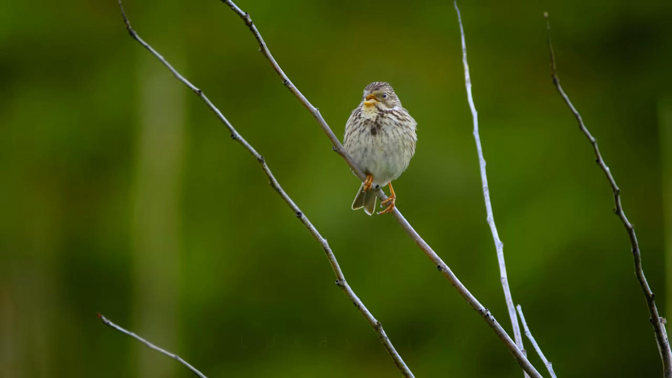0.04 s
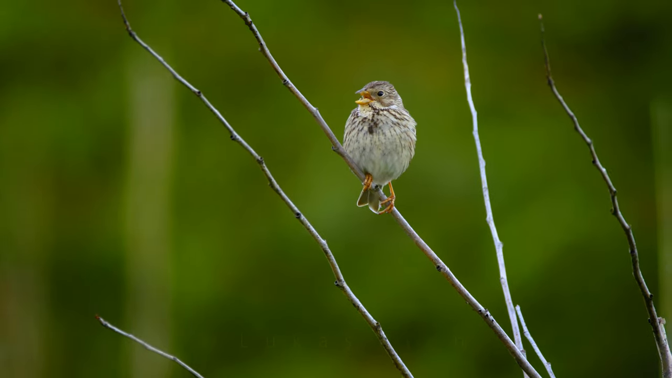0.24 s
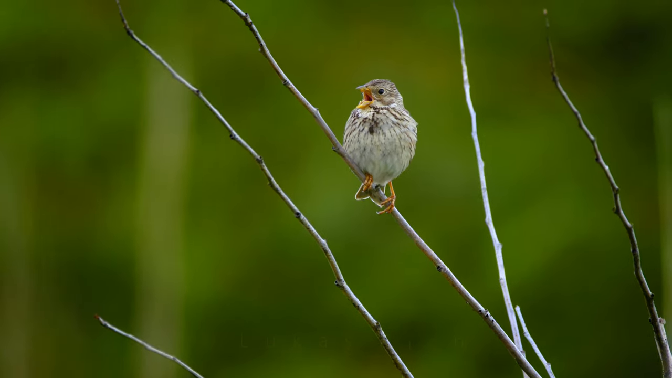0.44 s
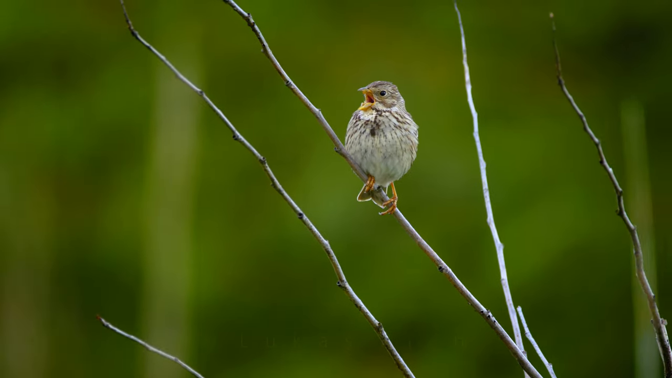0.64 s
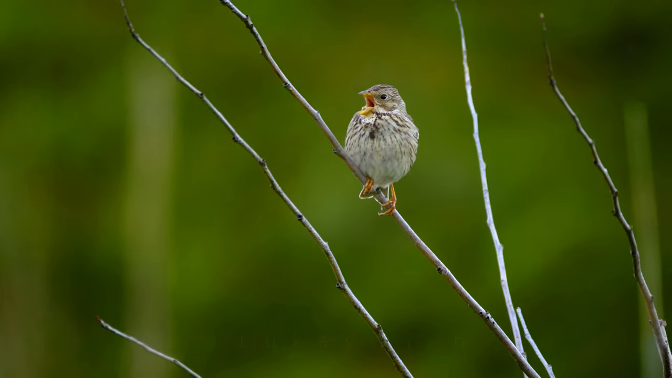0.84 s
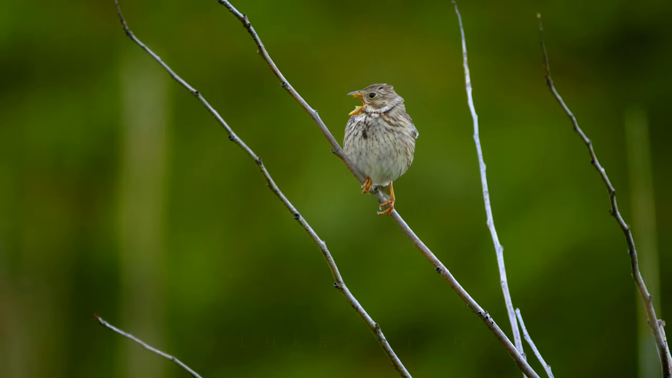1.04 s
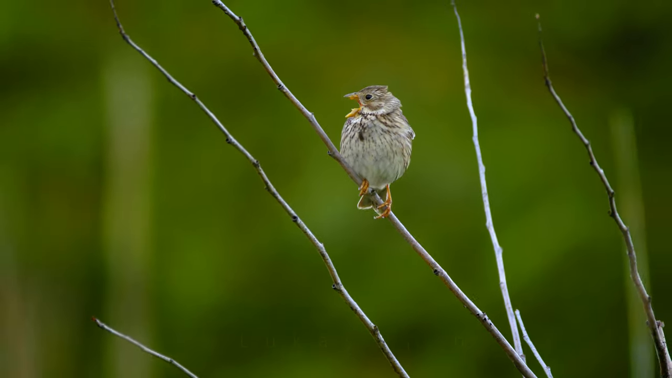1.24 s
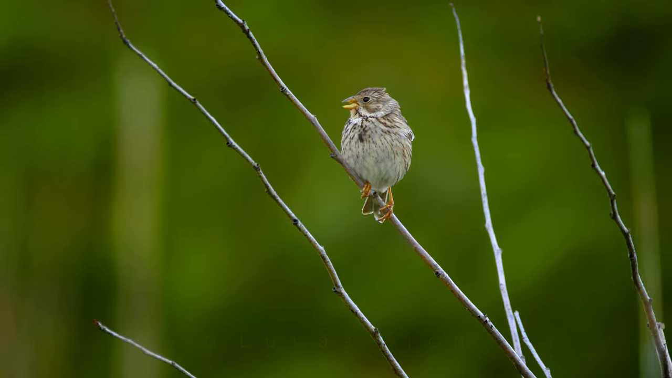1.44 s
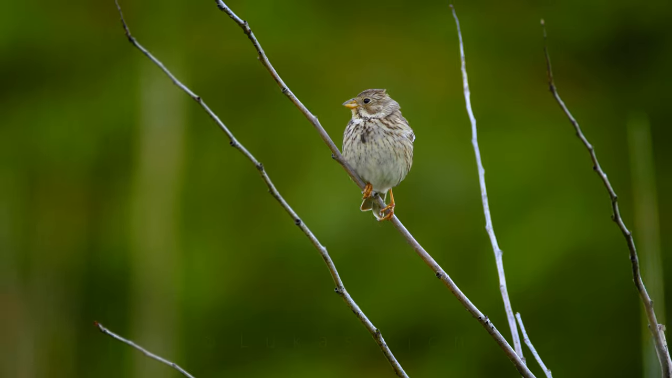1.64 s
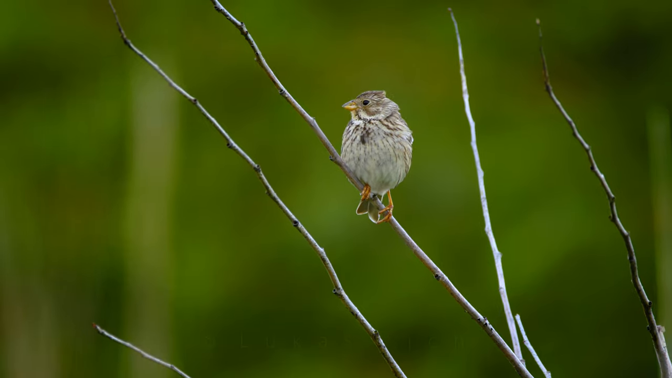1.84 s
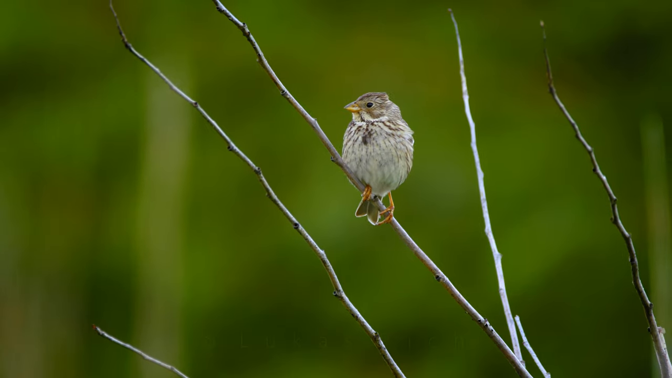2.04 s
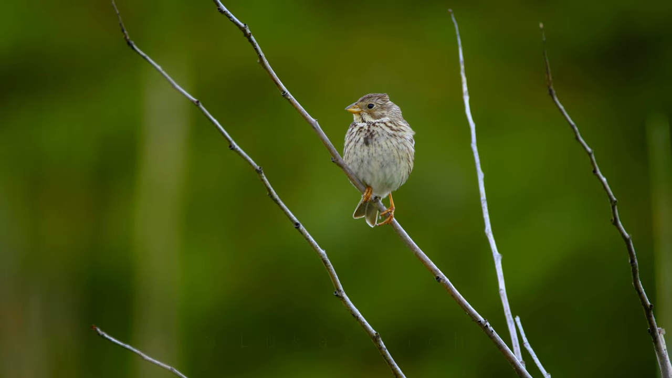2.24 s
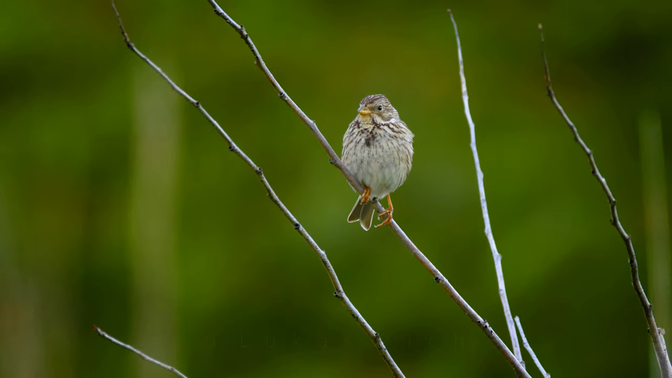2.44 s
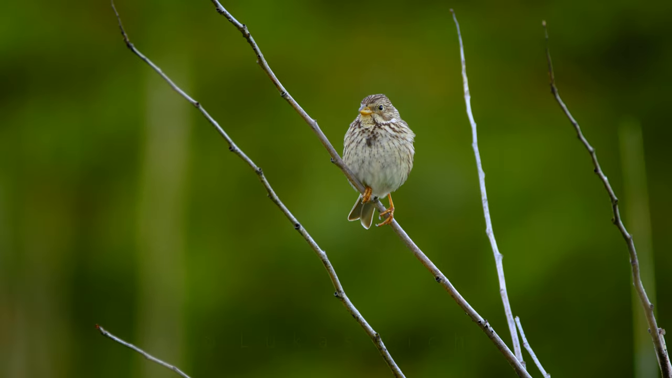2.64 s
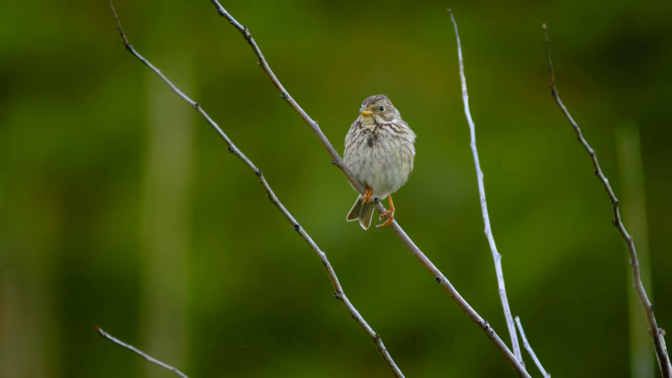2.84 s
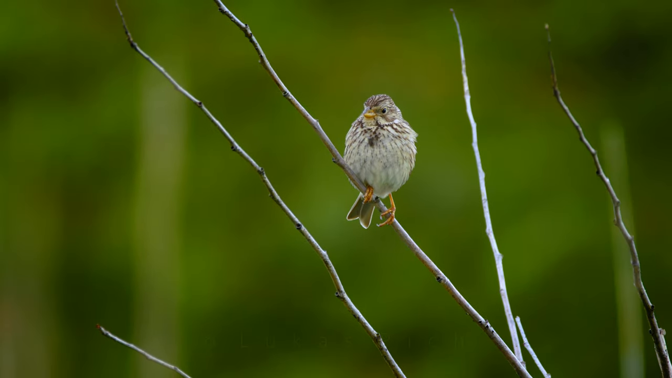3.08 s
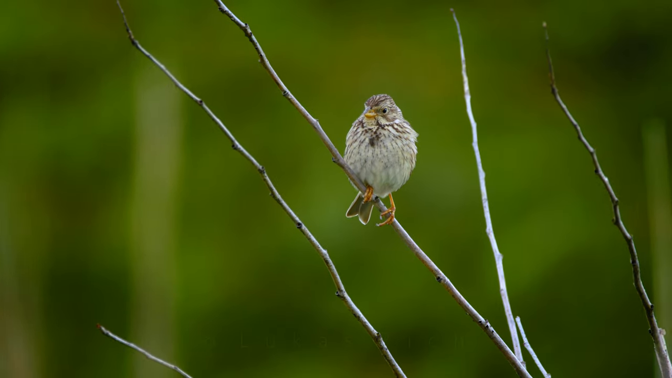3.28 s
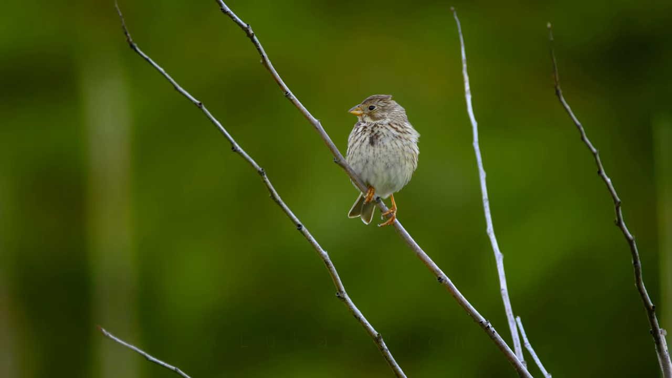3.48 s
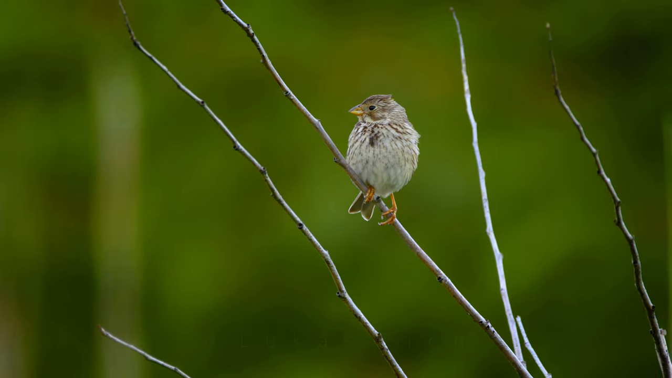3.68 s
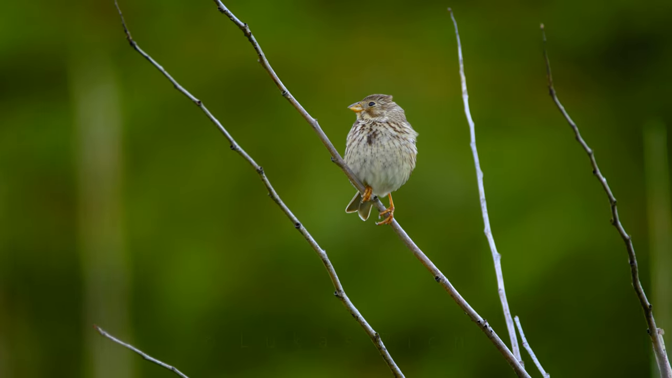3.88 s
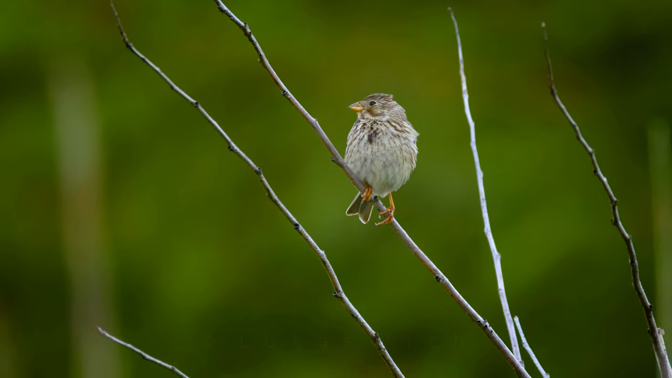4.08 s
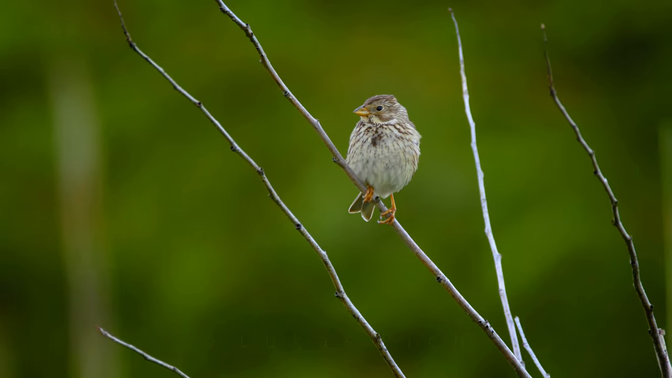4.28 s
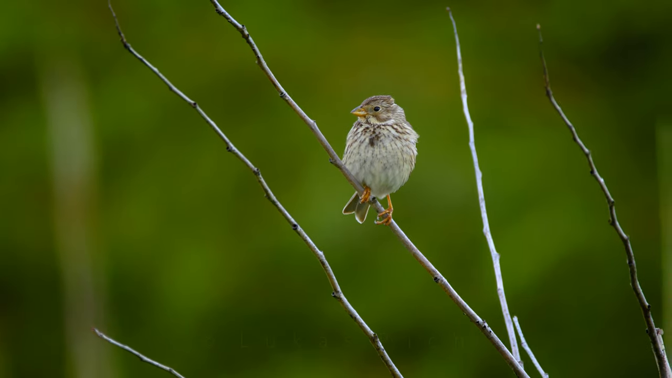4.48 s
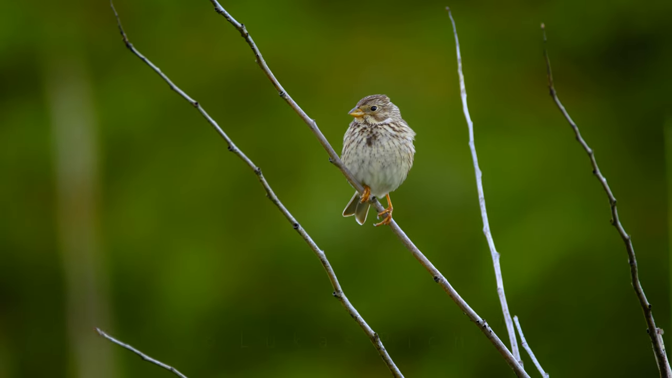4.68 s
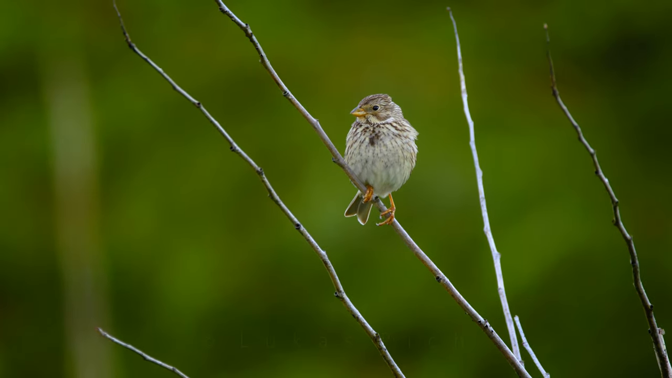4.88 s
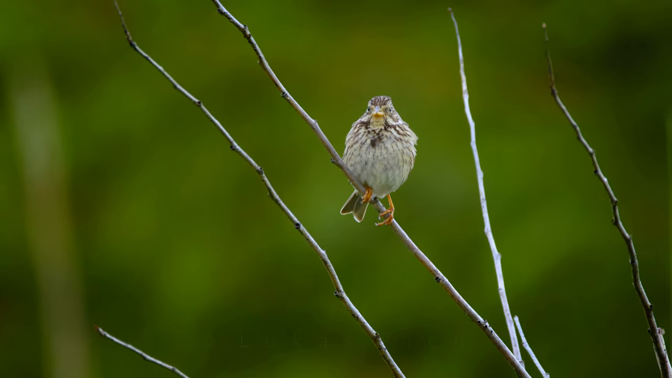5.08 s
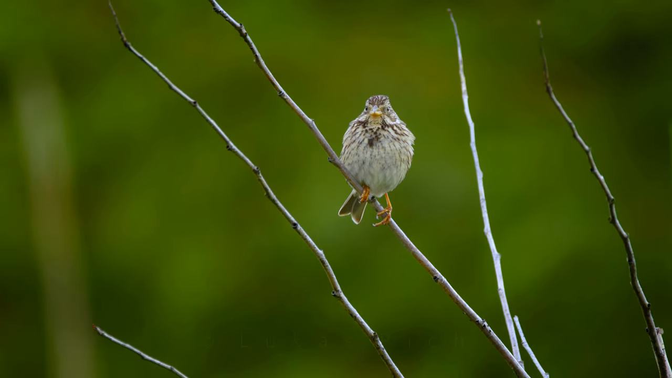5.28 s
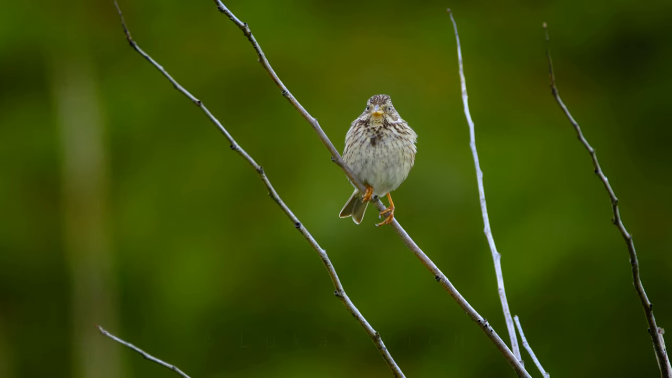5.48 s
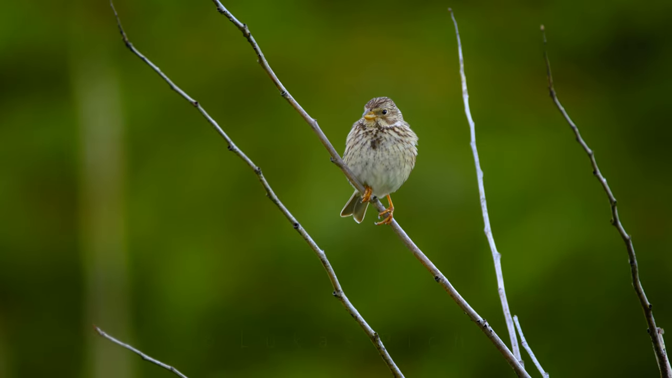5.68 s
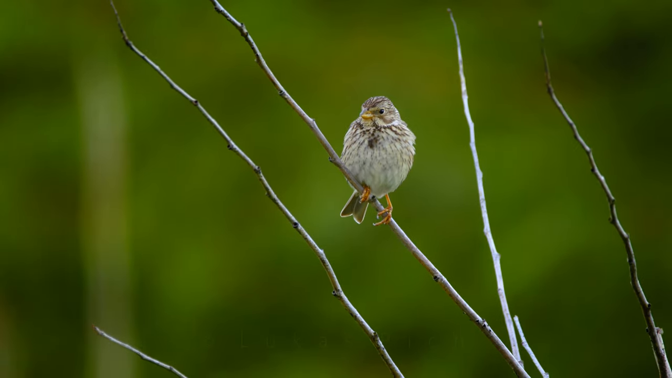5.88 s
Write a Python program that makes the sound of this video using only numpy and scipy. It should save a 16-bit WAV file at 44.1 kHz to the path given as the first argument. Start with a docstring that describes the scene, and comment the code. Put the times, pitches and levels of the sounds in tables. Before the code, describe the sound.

A small bunting sings one fast jangling song of dry chips, trills and buzzes, then scratchy distant calls continue over quiet meadow hiss.

```python
"""A corn bunting sings one jangling song: dry chips speed up into trills and buzzes from its two syrinx voices.
Each voice is a near sine gliding in pitch; bill resonances colour it and near surfaces echo it.
Further off a small bird repeats a scratchy four-pulse call, built from harmonics ringing in its throat.
Distant birds whistle in slow glides and twitter in random chirps.
Behind them shaped noise gives the air, a far road and ticking grass, over a very faint low hum."""
import sys
import numpy as np
from scipy import signal
from scipy.fft import rfft, irfft, next_fast_len
from scipy.io import wavfile
from scipy.ndimage import map_coordinates

SR = 44100
rng = np.random.default_rng(int(sys.argv[2]) if len(sys.argv) > 2 else 0)


def waveform_to_disk(signal):
    """Save audio, clipped to [-1, 1], as 16-bit WAV at the path in sys.argv[1]."""
    frames = np.transpose(np.atleast_2d(signal))
    scaled = np.clip(frames, -1, 1) * 32767
    samples = np.round(scaled).astype(np.int16)
    wavfile.write(sys.argv[1], SR, samples)


N = 261072
TIME = np.arange(N) / SR

# All levels are relative: modulation, filtering or a mixing gain follows.
# Dry chips that open the song. Each row: start in seconds, level in dB.
CHIPS = [(.232, -22), (.382, -20.5), (0.477, -23)]
# A faint flick and a stroke make every chip. Each row: delay in seconds, length in seconds,
# start, middle and end pitch in Hz, level in dB.
CHIP_FIGURE = [(-.003, .003, 7250, 6150, 5330, -20), (0, 0.0086, 5100, 4890, 4250, -0.5)]
# Downslurs, steep at first. Each row: start in seconds, length in seconds, start Hz, end Hz, level in dB.
SLURS = [(.049, 0.022, 7240, 4230, -23), (0.5233, 0.01, 6950, 4670, -24),
         (0.938, 0.0089, 6630, 5090, -23.5), (1.003, .011, 8140, 6770, -19),
         (1.0105, .009, 6600, 5110, -25), (1.079, .011, 8200, 6730, -21), (1.087, 0.0094, 6700, 5030, -21),
         (1.392, 0.02, 7900, 5180, -20), (1.425, 0.022, 6100, 5370, -22.5)]
SLUR_SAG = 0.15   # share of the drop by which the middle hangs below a straight glide
# Pips of the low voice, scooping up to a held pitch. Each row: start in seconds, length in seconds,
# held pitch in Hz, level in dB.
LOW_PIPS = [(.075, .014, 4260, -29), (0.66, 0.011, 5180, -22), (.733, .013, 5240, -21.5),
            (0.898, 0.008, 5280, -21), (0.95, 0.0083, 5350, -26), (0.985, 0.011, 5366, -20),
            (1.056, 0.014, 5387, -25), (1.102, 0.013, 5374, -19.5), (1.145, 0.016, 5540, -27.5),
            (1.216, 0.0092, 5520, -23.5), (1.264, 0.019, 5840, -21), (1.281, 0.0071, 5606, -17),
            (1.445, 0.024, 5184, -27)]
SCOOP, PIP_END = 0.083, 1.004   # share by which a low pip starts flat; ratio of end pitch to held pitch
# Pips of the high voice. Each row: start in seconds, length in seconds, level in dB.
HIGH_PIPS = [(.908, 0.013, -19), (0.923, 0.005, -22), (1.227, 0.019, -22), (1.243, 0.017, -19.5)]
# Pitch of every high pip: start, middle and end in Hz.
HIGH_PIP_HZ = (7730, 7540, 7200)
# Figures that the trills repeat, shared by the two voices. Each row: delay in seconds, length in seconds,
# start, middle and end pitch in Hz, level in dB.
RATTLE = [(0, 0.0094, 4530, 4940, 5660, -28.5), (.006, 0.00857, 6150, 5190, 4470, -19.5),
          (.013, .006, 5600, 5100, 4650, -27)]
FORK = [(0, 0.0085, 5250, 5260, 4550, -25), (.0005, 0.0052, 5450, 7300, 7700, -25.5)]
JINGLE = [(0, 0.0081, 7600, 7420, 7350, -22.5), (.0055, .0075, 5800, 5450, 5100, -25)]
CASCADE = [(0, 0.0084, 7910, 7290, 6800, -23), (.0045, .008, 7100, 6150, 4570, -25)]
# Trills. Each row: start in seconds, number of repeats, period in seconds, gain in dB,
# lift of the overtones in dB, figure repeated.
TRILLS = [(.535, 7, .0176, -1, -3.5, RATTLE), (0.8186, 7, .0112, -0.5, 14.5, FORK),
          (0.958, 2, .0105, 2, 4, JINGLE), (1.016, 4, .0114, -2.5, -2, JINGLE),
          (1.069, 1, .0114, 0, -1, JINGLE), (1.166, 4, .0116, -2.5, 6, JINGLE),
          (1.3008, 7, .0129, 0, 3, CASCADE)]
# Buzzes. Each row: start in seconds, length in seconds, start Hz, end Hz, upward flick in Hz,
# first and last flutter rate per second, level at the end in dB.
BUZZES = [(0.669, 0.056, 4870, 4690, 982, 410, 324, -19.5), (0.747, .049, 4860, 4727, 956, 422, 310, -18),
          (0.928, .015, 7570, 7200, 550, 820, 450, -17)]
# Overtones of a buzz. Each row: multiple of the pitch, level in dB.
BUZZ_OVERTONES = [(2, -25), (3, -33)]
# Overtones of a note or whistle. Each row: multiple of the pitch, level in dB.
NOTE_OVERTONES = [(2, -33), (3, -32)]
# Resonances of throat and bill. Each row: frequency in Hz, gain in dB.
BILL = [(3000, 1), (4200, 5), (4700, 0.5), (5300, 0.5), (6000, -2), (6600, -5), (7500, -5.5), (8400, 2),
        (9000, 3), (9900, 2.5), (11000, -5.5), (12500, 5.5), (14700, 8.5)]
# Echoes off twigs and ground. Each row: delay in seconds, level in dB.
NEAR_ECHOES = [(.0052, -16), (.0098, -18.5)]

# Scratchy calls of the second bird. Each row: centre of the first pulse in seconds, level in dB.
SCRATCHY_CALLS = [(0.151, -34), (0.591, -32), (1.190, -33.5), (1.578, -33), (2.6, -38.5), (3.013, -38),
                  (3.363, -36), (3.735, -33.5), (4.098, -36), (4.387, -40.5), (4.717, -41), (4.973, -43),
                  (5.256, -36), (5.605, -37), (5.855, -35.5)]
# Throat resonances of the second bird. Each row: frequency in Hz, gain in dB.
CALL_THROAT = [(1800, -26.5), (2450, -14), (2800, -20), (3120, -6), (3700, -17), (4400, -11), (4750, -1),
               (5000, 0.5), (5350, -5), (5730, 2.5), (6030, -11.5), (6330, -5.5), (6800, -38),
               (9000, -28.5)]
PULSE_PERIOD_S, PULSE_S, PULSE_HZ = .0212, .0178, 636.3   # spacing, length, nominal crest pitch
# Accents in dB, one per pulse of a call: a soft lead-in, then three strong ones.
PULSE_ACCENTS_DB = [-8.5, -.5, 0.5, -1.5]

# Rising whistles of a distant bird. Each row: start in seconds, length in seconds, level in dB.
UPSLURS = [(2.519, 0.3, -52), (5.351, 0.26, -56.5)]
# Pitch of every rising whistle: start and end in Hz.
UPSLUR_HZ = (2240, 3620)
# Other distant whistles, straight glides. Each row: start in seconds, length in seconds,
# start Hz, end Hz, level in dB.
STRAIGHT_WHISTLES = [(.09, 0.13, 3630, 3030, -53.5), (0.306, 0.048, 2680, 3200, -48.5),
                     (1.678, 0.16, 2746, 2710, -57), (2.369, 0.17, 3330, 3526, -54),
                     (2.69, 0.095, 4330, 4170, -61), (2.83, 0.13, 3850, 3330, -57.5),
                     (3.083, 0.14, 4640, 4750, -57.5), (3.15, .052, 3570, 4010, -56.5),
                     (4.183, .19, 3330, 3550, -55.5), (4.654, 0.063, 3450, 2420, -54),
                     (4.897, .064, 3750, 3020, -56), (5.209, 0.058, 3573, 3090, -54.5)]
# Bouts of distant twitter. Each row: start in seconds, end in seconds, notes per second, level in dB.
TWITTER_BOUTS = [(0, .55, 23.5, -56), (1.899, 2.4, 82.3, -60), (2.398, 5.0, 38, -60)]

# Puffs of wind that rustle the grass. Each row: start in seconds, length in seconds, level in dB.
PUFFS = [(2.342, .26, -54), (2.727, 0.2, -60.5)]
# Dry ticks in the grass. Each row: start in seconds, level in dB.
GRASS_TICKS = [(1.7428, -40), (1.775, -40), (2.7654, -43), (2.7986, -43), (3.024, -39.5), (3.5655, -45),
               (4.558, -45), (5.4538, -38.5)]
# Spectrum of the grass noise. Each row: frequency in Hz, level in dB.
GRASS_SPECTRUM = [(1000, -7), (2500, 0.5), (7000, 2), (11000, -2.5), (15500, -13)]
# Tyres on the far road, higher when faster. Each row: time in seconds, level in dB, centre in Hz.
TRAFFIC = [(0.0, -56, 1217), (0.94, -64.5, 1248), (2.14, -63, 1158), (2.51, -61.5, 1296), (2.85, -60, 1137),
           (3.18, -58.5, 1223), (3.51, -53, 1139), (4.01, -53, 1223), (4.32, -50.5, 1098),
           (4.57, -56.5, 1115), (5.77, -54, 1291), (5.92, -54, 1237)]
# Spectrum of the tyre noise. Each row: frequency in Hz, level in dB.
ROAD_SPECTRUM = [(150, -79), (300, -50), (550, -19.5), (900, -9), (1020, -2.5), (1160, 2), (1330, -2),
                 (1550, -19), (2500, -31)]
ROAD_HZ = 1172.6   # centre of the tyre noise at cruising speed
# Spectrum of the air noise. Each row: frequency in Hz, level in dB.
AIR_SPECTRUM = [(30, -31.5), (120, -42), (180, -46), (280, -38.5), (390, -32), (575, -17.5), (920, -10),
                (1140, -4.5), (1550, -4), (2690, -2.5), (3400, -3), (4540, -6.5), (6050, -12.5),
                (15500, -15.5)]


def from_db(db):
    """Definition of the decibel: 20 dB is a tenfold amplitude."""
    return 10 ** (np.asarray(db) / 20)


def rms_one(x):
    """Normalisation of power: the root mean square becomes 1."""
    return x / np.sqrt(np.mean(x ** 2) + 1e-20)


def gain_at(points, hz):
    """Frequency response: gain interpolated in dB along a log-frequency axis."""
    f, db = np.transpose(points)
    return from_db(np.interp(np.log(hz + 1e-3), np.log(f), db))


def coloured(x, points):
    """Linear filtering: each spectral component is scaled by the response."""
    response = gain_at(points, np.fft.rfftfreq(len(x), 1 / SR))
    return irfft(rfft(x) * response, len(x))


def noise(points):
    """Coloured noise: white noise filtered to a spectrum, at rms 1."""
    white = rng.standard_normal(next_fast_len(N))
    return rms_one(coloured(white, points)[:N])


def high_pass(x, hz):
    """High-pass filtering: components below the corner are attenuated."""
    return signal.sosfilt(signal.butter(4, hz, "high", fs=SR, output="sos"), x + 1e-18)


def wobble(t, rate):
    """Random modulation: normal values at a rate per second, joined by straight lines."""
    return np.interp(t * rate, np.arange(256), rng.standard_normal(256))


def add(out, s, sound):
    """Superposition: a sound is summed in from a time in seconds."""
    at = max(int(round(s * SR)), 0)
    part = sound[:max(N - at, 0)]
    out[at:at + len(part)] += part


def span(length):
    """Time base of a note: seconds elapsed, and progress from 0 to 1."""
    t = np.arange(max(int(length * SR), 8)) / SR
    return t, np.linspace(0, 1, len(t))


def swell(u, edge):
    """Amplitude envelope: the air valve opens and shuts smoothly, each over a share of the note."""
    nearest_end = np.minimum(u, 1 - u)
    return np.sin(np.pi / 2 * np.clip(nearest_end / edge, 0, 1)) ** 2


def tone(hz, loudness, overtones, purity=6.4):
    """Weakly nonlinear source: overtones grow with loudness and fade as pitch rises above 5 kHz."""
    phase = 2 * np.pi * np.cumsum(hz) / SR
    upper = 0
    for k, db in overtones:
        below_nyquist = k * hz < SR / 2
        upper = upper + from_db(db) * np.sin(k * phase) * below_nyquist
    richness = loudness * np.minimum(5000 / hz, 1) ** purity
    return np.sqrt(2) * loudness * (np.sin(phase) + upper * richness)


def scatter(x, t60, wet_db):
    """Diffuse scattering: leaves and stalks return a tail that decays 60 dB in t60 seconds."""
    t = TIME[:SR // 2]
    tail = rng.standard_normal(len(t)) * from_db(-60 * t / t60) * (t > .004)
    return from_db(wet_db) * signal.fftconvolve(x, tail / np.linalg.norm(tail))[:N]


def bunting():
    """Source and filter: two syrinx voices pass through the bill and reflect off near surfaces."""
    song = np.zeros(N)
    for s, *shape in song_notes():
        add(song, s, note(*shape))
    for s, *shape in BUZZES:
        add(song, s, buzz(*shape))
    # the two voices load each other: squaring yields their sum tones
    sums = high_pass(song ** 2, 8500)
    # the air stream adds a faint rasp
    breath = noise([(100, -12.5), (2000, 2.0), (9000, -19), (16000, -28)])
    rasp = high_pass(song * breath, 2500)
    song = coloured(song + from_db(-8) * sums + from_db(-31) * rasp, BILL)
    out = song + scatter(song, t60=0.04, wet_db=-9) + scatter(song, t60=0.52, wet_db=-23.5)
    for delay, db in NEAR_ECHOES:
        add(out, delay, from_db(db) * song)
    return out


def song_notes():
    """Pitch arcs of the song: start s, length s, three pitches Hz, level dB, and overtone lift in trills."""
    notes = []
    for s, db in CHIPS:
        for delay, *shape, part_db in CHIP_FIGURE:
            notes.append((s + delay, *shape, db + part_db))
    for s, length, top, low, db in SLURS:
        middle = (top + low) / 2 - SLUR_SAG * (top - low)
        notes.append((s, length, top, middle, low, db))
    for s, length, hz, db in LOW_PIPS:
        notes.append((s, length, hz * (1 - SCOOP), hz, hz * PIP_END, db))
    for s, length, db in HIGH_PIPS:
        notes.append((s, length, *HIGH_PIP_HZ, db))
    for s, count, period, gain_db, harsh_db, figure in TRILLS:
        for k in range(count):
            for delay, length, *pitches, db in figure:
                # no two repeats are quite alike in pitch or level
                pitches = np.multiply(pitches, 1 + 0.0096 * rng.normal())
                level_db = db + gain_db + .93 * rng.normal()
                notes.append((s + k * period + delay, length, *pitches, level_db, harsh_db))
    return notes


def note(length, start_hz, middle_hz, end_hz, db, harsh_db=0):
    """Frequency glide: one voice follows a parabola; brief notes tremble and longer ones are cleaner."""
    t, u = span(length)
    arc = np.polyfit([0, .5, 1], [start_hz, middle_hz, end_hz], 2)
    hz = np.polyval(arc, u)
    unsteady = min(0.0097 / length, 1) ** 2   # full tremble up to 9.7 ms
    loudness = swell(u, 0.32) * from_db(unsteady * 1.55 * wobble(t, 600))
    overtones = [(k, level_db + harsh_db) for k, level_db in NOTE_OVERTONES]
    trembling_hz = hz * (1 + unsteady * 0.025 * wobble(t, 900))
    return from_db(db) * tone(trembling_hz, loudness, overtones)


def buzz(length, start_hz, end_hz, flick_hz, first_rate, last_rate, db):
    """Frequency and amplitude modulation: a slowing flutter flicks the pitch up and chokes the tone."""
    choke, lag, sharp = 0.52, 0.5, 1.93   # depth of the choke, its lag in radians, peakedness of a flick
    t, u = span(length)
    rate = (first_rate + (last_rate - first_rate) * u) * (1 + 0.043 * wobble(t, 270))
    flutter = 2 * np.pi * np.cumsum(rate) / SR
    flick = np.exp(sharp * (np.cos(flutter) - 1))
    hz = start_hz + (end_hz - start_hz) * u + flick_hz * flick
    closing = choke * np.exp(sharp * (np.cos(flutter - lag) - 1))
    opening = swell(u, 0.11) * (1 - closing)
    growth = from_db(db + 3 * (u - 1))   # rises 3 dB through the buzz
    return growth * tone(hz * (1 + 0.0057 * wobble(t, 1200)), opening, BUZZ_OVERTONES)


def scratchy_bird():
    """Formant filtering: harmonics of low pulses, rising then falling in pitch, ring in the throat."""
    arch, crest = 0.785, 0.379   # curvature of the pitch arch, and its crest as a share of the pulse
    out, multiples = np.zeros(N), np.arange(3, 14)[:, None]
    for s, db in SCRATCHY_CALLS:
        for k, accent_db in enumerate(PULSE_ACCENTS_DB):
            t, u = span(PULSE_S)
            hz = PULSE_HZ * (1 - arch * (u - crest) ** 2 + 0.013 * wobble(t, 1200) + 0.0079 * rng.normal())
            start_phases = rng.uniform(0, 2 * np.pi, multiples.shape)
            phases = multiples * 2 * np.pi * np.cumsum(hz) / SR + start_phases
            harmonics = gain_at(CALL_THROAT, multiples * hz) * np.sin(phases)
            pulse = rms_one(np.sum(harmonics, axis=0))
            start = s + k * PULSE_PERIOD_S - PULSE_S / 2
            add(out, start, from_db(db + accent_db) * swell(u, 0.43) * pulse)
    out = high_pass(out, 1200)
    return out + scatter(out, t60=0.29, wet_db=-9)


def distant_birds():
    """Direct and diffuse sound: whistles and twitter blur in a tail, fed more strongly by the twitter."""
    whistles, twitter = distant_whistles(), distant_twitter()
    return whistles + twitter + scatter(from_db(-4.5) * whistles + twitter, t60=0.12, wet_db=-3)


def distant_whistles():
    """Propagation through moving air: it makes the level of the far whistles flutter."""
    whistles = np.zeros(N)
    for s, length, db in UPSLURS:
        add(whistles, s, whistle(length, *UPSLUR_HZ, db, ease=0.72, edge=0.2))
    for s, *shape, db in STRAIGHT_WHISTLES:
        add(whistles, s, whistle(*shape, db, ease=0, edge=0.062))
    return from_db(-2) * whistles * from_db(2.5 * wobble(TIME, 40))


def whistle(length, start_hz, end_hz, db, ease, edge):
    """Slow frequency glide: straight (ease 0), or easing out of one pitch into the other (ease 1)."""
    t, u = span(length)
    progress = u + ease * (np.sin(np.pi / 2 * u) ** 2 - u)
    hz = (start_hz + (end_hz - start_hz) * progress) * (1 + 0.0066 * wobble(t, 90))
    return from_db(db) * tone(hz, swell(u, edge), NOTE_OVERTONES)


def distant_twitter():
    """Random succession of chirps: time, length, pitch, slide and level all vary."""
    twitter = np.zeros(N)
    for start, end, per_s, db in TWITTER_BOUTS:
        count = int((end - start) * per_s)
        for k, (when, length, pitch, glide, loud) in enumerate(rng.random((count, 5))):
            hz = 2700 + 1950 * pitch
            slide = 900 * (glide - .5)
            chirp = note(.01 + 0.0373 * length, hz - slide, hz, hz + slide, db + 6 * (loud - .5))
            add(twitter, start + (k + when) / per_s, chirp)
    return twitter


def grass():
    """Friction and impact noise: puffs of wind swell a rustle, and ticks decay within milliseconds."""
    level = np.full(N, from_db(-75))   # calm grass
    for s, length, db in PUFFS:
        add(level, s, from_db(db) * swell(span(length)[1], 0.47))
    t = TIME[:SR // 50]
    for s, db in GRASS_TICKS:
        add(level, s, from_db(db - 4 - 60 * t / 0.017))   # 60 dB of decay in 17 ms
    return high_pass(level * noise(GRASS_SPECTRUM), 900)


def far_road():
    """Tyre noise: reading a fixed noise pattern faster raises its whole spectrum."""
    s, db, hz = np.transpose(TRAFFIC)
    travelled = np.cumsum(np.interp(TIME, s, hz / ROAD_HZ))   # position in the pattern, in samples
    pattern = rms_one(coloured(rng.standard_normal(N), ROAD_SPECTRUM))
    tyres = map_coordinates(pattern, [travelled], mode="grid-wrap")
    return from_db(np.interp(TIME, s, db) - 2) * tyres


def air():
    """Stationary broadband noise: the steady hiss of the meadow."""
    return from_db(-53.5) * noise(AIR_SPECTRUM)


def hum():
    """Pure tone: a steady, very faint sine at 82.7 Hz."""
    return from_db(-104) * np.sqrt(2) * np.sin(2 * np.pi * 82.7 * TIME)


def scene():
    """Superposition: the pressures of all sources add at one microphone."""
    birds = bunting() + scratchy_bird() + distant_birds()
    return (birds + grass() + far_road() + air() + hum())[None]


def record(dry):
    """Low-pass filtering: an elliptic filter cuts the top steeply above 15.9 kHz."""
    return signal.sosfilt(signal.ellip(10, .1, 80, 15900, fs=SR, output="sos"), dry)


dry = scene()
out = record(dry)
waveform_to_disk(out)
```